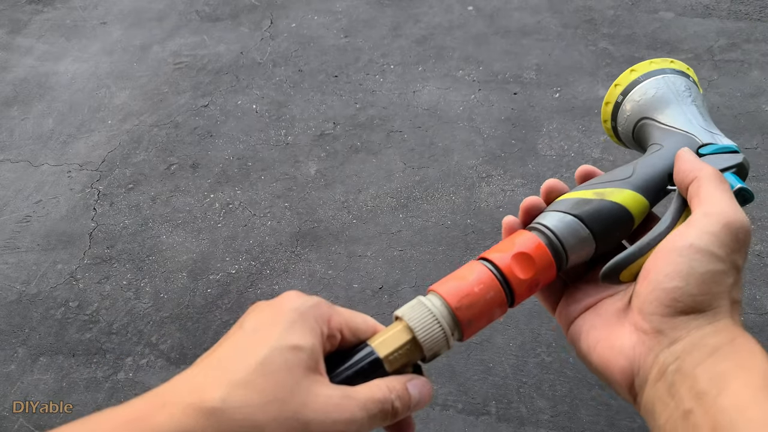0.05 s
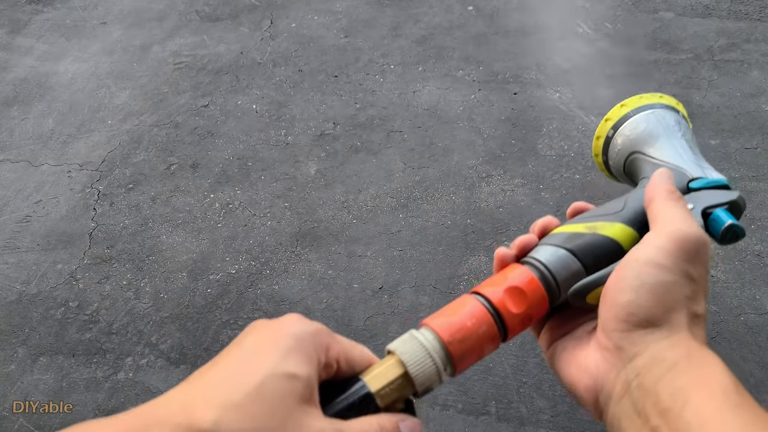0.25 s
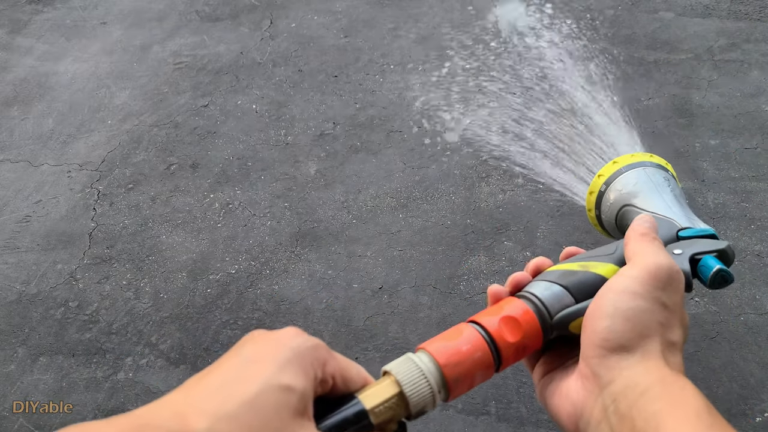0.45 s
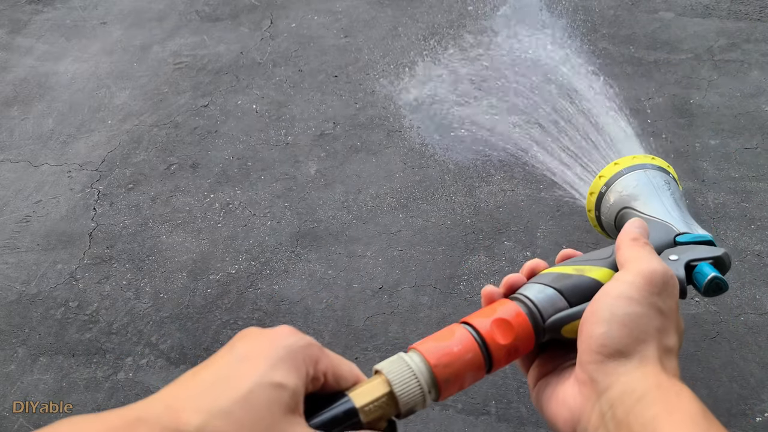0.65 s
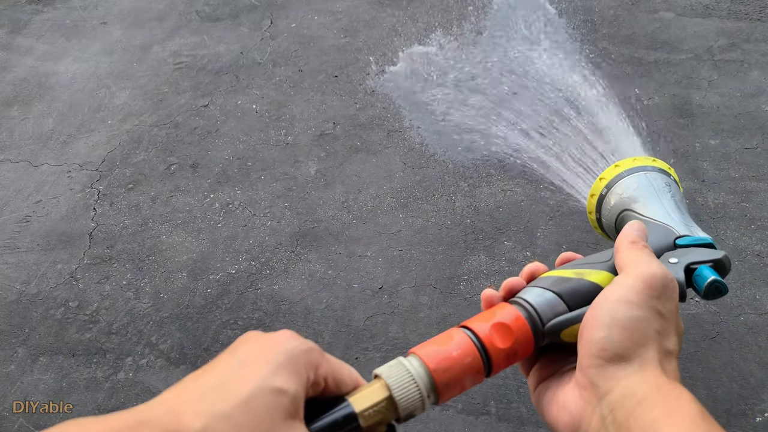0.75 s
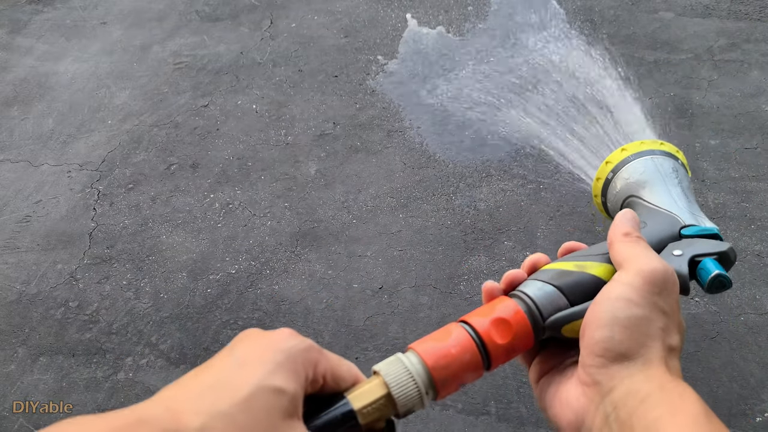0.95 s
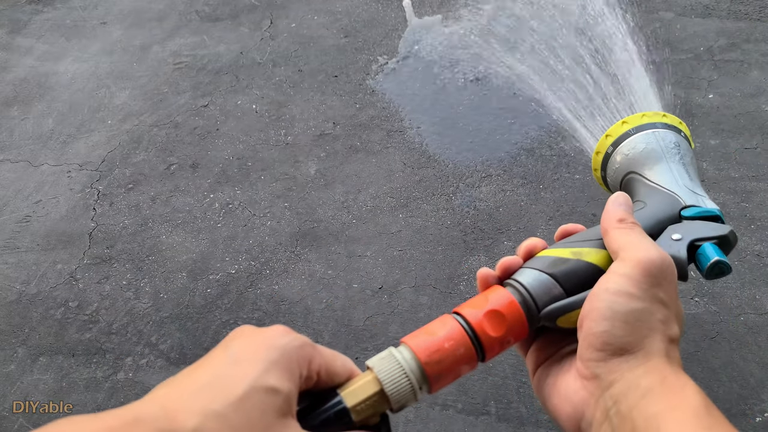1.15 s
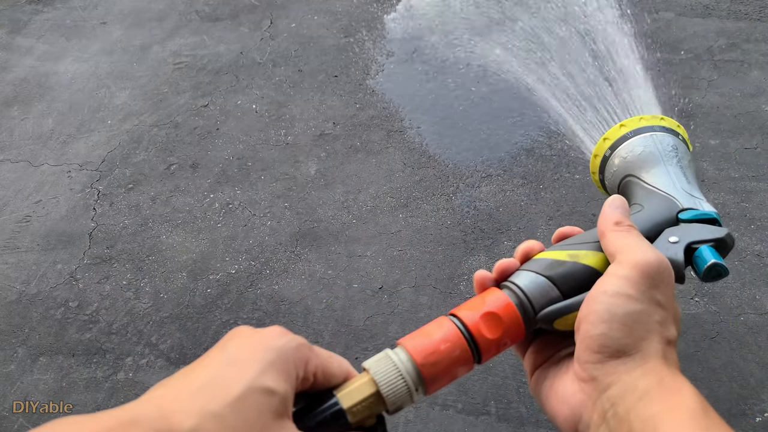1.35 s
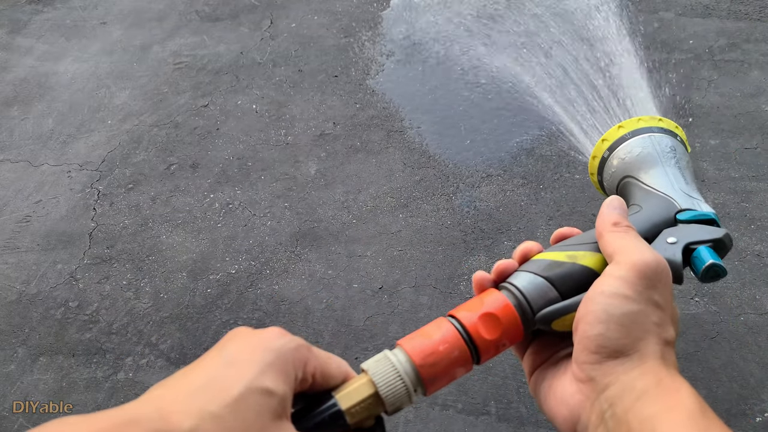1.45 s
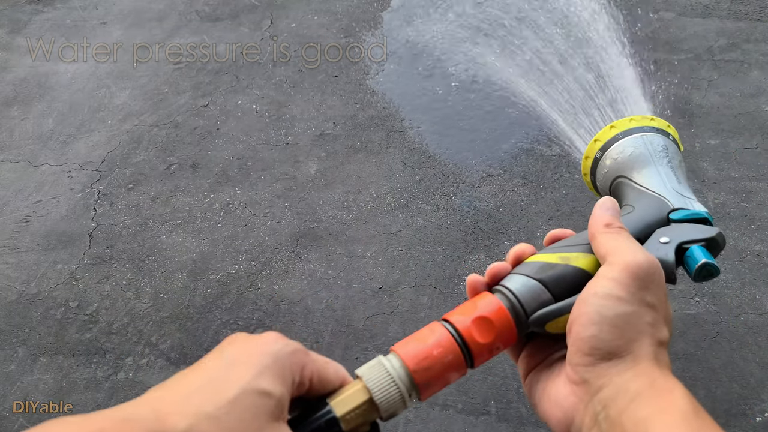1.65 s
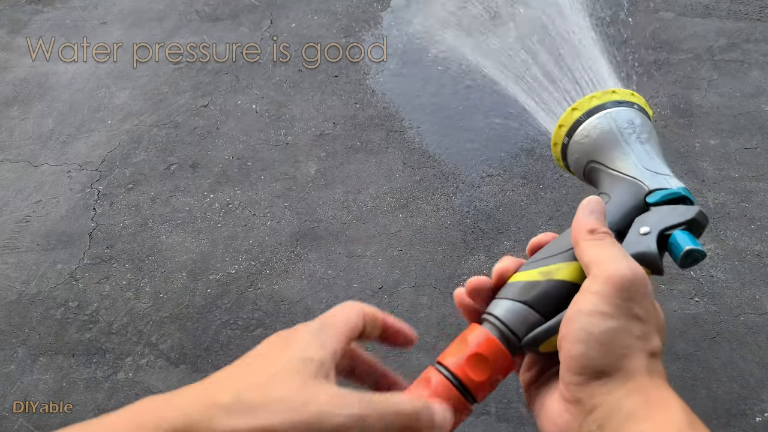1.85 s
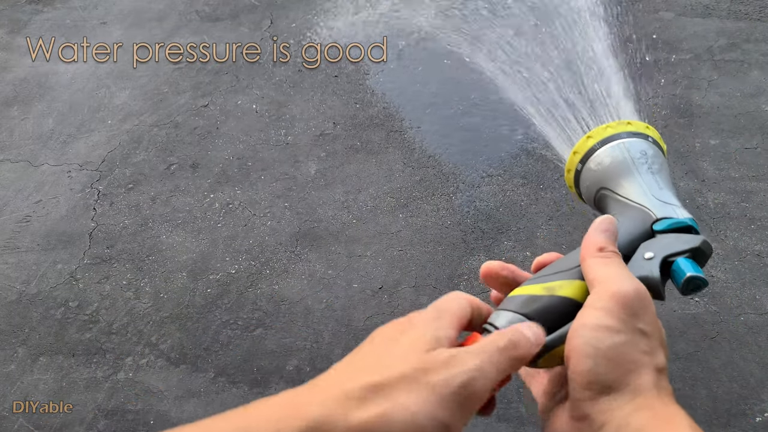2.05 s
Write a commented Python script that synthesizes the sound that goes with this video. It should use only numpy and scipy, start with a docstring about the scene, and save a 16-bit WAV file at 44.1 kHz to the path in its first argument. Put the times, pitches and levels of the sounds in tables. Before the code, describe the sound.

Water sprays from a hose nozzle with a sharp spitting air burst, then a steady hiss

```python
"""Outdoors over asphalt: a hose nozzle is squeezed open, heard from the right by two microphones
a few centimetres apart. Trapped air spits out in a burst, then the spray settles to a hiss.
Air and spray are clicks and noise with drifting colour; larger splats are made of short rings.
The valve's kick is damped sines, two hand knocks ring the fittings' modes, and a distant
low rumble is filtered noise."""
import sys
import numpy as np
from scipy import signal
from scipy.fft import rfft, irfft
from scipy.io import wavfile
from scipy.ndimage import uniform_filter1d

SR = 44100
rng = np.random.default_rng(int(sys.argv[2]) if len(sys.argv) > 2 else 0)


def bounce(signal):
    """Save signal as a 16-bit WAV file at the path given by the first command-line argument."""
    frames = np.transpose(np.atleast_2d(signal))
    limited = np.clip(frames, -1, 1)
    pcm = np.round(limited * 32767).astype(np.int16)
    wavfile.write(sys.argv[1], SR, pcm)


def invert_db(level):
    """Linear amplitude ratio for a level in decibels (20 dB per decade), elementwise."""
    return 10 ** (np.asarray(level, dtype=float) / 20)


N = 92610
TIME_S = np.arange(N) / SR
HZ = np.fft.rfftfreq(N, 1 / SR)

# power share common to both microphones: freq_hz, water_0_1, air_0_1, rumble_0_1
SHARED_POWER = [(30, 0.82, .97, 1), (69.5, 0.46, .97, 0.93), (150, 0.75, .97, 1), (300, 0.41, 0.91, 0.93),
                (550, 0.51, 0.78, 0.52), (880, 0.45, 0.56, 0.12), (2230, 0.87, 1, 0.13),
                (3700, 0.71, 0.27, 0.13), (7000, 0.16, 0.4, .2), (16000, 0.11, 0.81, .15)]
NOZZLE_LAG_S = 4 / 44100  # left hears the common part later


def read(points, hz, count=1):
    """Column of a table at the given frequencies, on a log axis."""
    table = np.array(points)
    return np.interp(np.log(hz + 1), np.log(table[:, 0] + 1), table[:, count])


def curve(points, count=1):
    """Column of a table along time."""
    table = np.array(points)
    return np.interp(TIME_S, table[:, 0], table[:, count])


def evened(x):
    """Scale to rms 1."""
    return x / np.sqrt(np.mean(x ** 2) + 1e-20)


def coloured(x, gain):
    """Filter by a gain for each frequency."""
    return irfft(rfft(x) * gain, N)


def left_right(left_db):
    """Gains of a source whose left side is set against the right."""
    return invert_db(np.array([[left_db], [0]]))


def pair(streams, share, lag_s):
    """One stream reaches both microphones, the other two one each; power shares add to 1."""
    share = np.clip(share, 0, 1)
    spectra = rfft(streams)
    left_delay = np.exp(-2j * np.pi * HZ * lag_s)
    common = spectra[0] * np.array([left_delay, np.ones(len(HZ))])
    return irfft(np.sqrt(share) * common + np.sqrt(1 - share) * spectra[1:], N)


def drops(per_s, spread_db, grain):
    """Three streams of random clicks of uneven size over smooth noise; grain weights the clicks."""
    hit = rng.random((3, N))
    size = rng.exponential(1, (3, N))
    noise = rng.standard_normal((3, N))
    clicks = (hit < per_s / SR) * np.sign(noise) * invert_db(spread_db * np.minimum(size, 4))
    grain = np.clip(grain, 0, 1)
    smooth = np.roll(noise, 999, axis=1)  # unties the noise from the click signs
    return np.sqrt(grain) * evened(clicks) + np.sqrt(1 - grain) * smooth


def patchy(x, patch_db, flicker_db, size=256):
    """Random level patches in time and frequency, and a flicker shared over wide bands."""
    overlap = size * 3 // 4
    z = signal.stft(x, nperseg=size, noverlap=overlap)[2]
    a, b = rng.standard_normal((2,) + z.shape[:0:-1])  # frames by bins, same for both sides
    patch = uniform_filter1d(uniform_filter1d(a, size=24, axis=0), size=3, axis=1)
    flicker = uniform_filter1d(uniform_filter1d(b, size=3, axis=0), size=30, axis=1)
    z = z * invert_db(patch_db * evened(patch) + flicker_db * evened(flicker)).T
    return signal.istft(z, nperseg=size, noverlap=overlap)[1][:, :N]


def blended(x, tone, share):
    """Cross-fade between the two colours of a table."""
    first = coloured(x, invert_db(read(tone, HZ, count=1)))
    second = coloured(x, invert_db(read(tone, HZ, count=2)))
    share = np.clip(share, 0, 1)
    return evened((1 - share) * first + share * second)


def rumble():
    """Far traffic or machinery: noise with a lumpy hump in the bass, a little louder at first."""
    # noise colour: freq_hz, relative_db_per_hz
    tone = [(15, -19), (40, -7.5), (55, -6), (66, -1), (78, 2), (95, -6), (125, -10.5), (200, -13.5),
            (400, -23.5), (700, -33.5), (950, -33), (1300, -38), (2500, -45.5), (5000, -60.5), (7000, -55),
            (9000, -61), (16000, -70)]
    level_db, early_db, fade_s = -41.5, 3.5, 0.72
    x = pair(rng.standard_normal((3, N)), read(SHARED_POWER, HZ, count=3), 0)
    extra_db = early_db * np.exp(-TIME_S / fade_s)
    return evened(coloured(x, invert_db(read(tone, HZ)))) * invert_db(level_db + extra_db)


def knocks():
    """A hand knocks the plastic fittings: same modes each time, a slower touch weakens the high ones."""
    # knocks: start_s, level_db, rise_s
    hits = [(2.0107, -21.5, 0.00015), (2.0592, -10.5, 0.0015)]
    # modes of the fittings: freq_hz, relative_db, t60_s
    modes = [(1226, -21, 0.025), (1570, -4, 0.014), (1720, -1.5, 0.022), (2300, -10, 0.014),
             (3210, -7, 0.02), (4100, 1, 0.0085), (4700, -9, 0.0099), (7100, -5, .007), (10200, 4, .005),
             (14500, 3, 0.006)]
    out = np.zeros((2, N))
    phases_rad = rng.normal(0, 0.57, (len(hits), len(modes), 2, 1))  # each side its own
    for (start_s, level_db, rise_s), hit_phases in zip(hits, phases_rad):
        t = np.maximum(TIME_S - start_s, 0)
        for (hz, mode_db, t60_s), phase in zip(modes, hit_phases):
            soft = (1 - np.exp(-t / rise_s)) / (1 + (hz * rise_s / 2) ** 2)
            decay = invert_db(level_db + mode_db - 60 * t / t60_s)
            out += decay * soft * np.sin(2 * np.pi * hz * t + phase)
    return out * left_right(-4)


def kick():
    """The hose kicks as the valve opens: low damped swings with a soft start."""
    # swings: start_s, level_db, freq_hz, t60_s
    swings = [(0.29, -28.5, 79, 0.15), (.236, -24, 185.6, 0.13), (.228, -28, 500, 0.16)]
    out = np.zeros(N)
    for start_s, level_db, hz, t60_s in swings:
        t = np.maximum(TIME_S - start_s, 0)
        soft = 1 - np.exp(-t * hz)
        out += invert_db(level_db - 60 * t / t60_s) * soft * np.sin(2 * np.pi * hz * t)
    return out * left_right(-3)


def splats():
    """Splats of water: short decaying rings, phase shaken differently at each microphone."""
    # one ring a row; the rows near 1.333 s together make one sharp splat:
    # start_s, level_db, centre_hz, ring_cycles (to fall 13 dB)
    rings = [(.378, -24, 2800, 3), (.7053, -19, 6300, 5), (.888, -25, 6500, 5), (1.1005, -22, 5000, 4),
             (1.333, -21, 12800, 6), (1.3337, -11, 12300, 7), (1.3341, -21, 5400, 5),
             (1.3392, -21, 11800, 26), (1.4478, -23, 6800, 7), (1.4527, -19, 13500, 6),
             (1.6275, -23, 13000, 5), (1.7205, -24, 5300, 4), (1.8628, -21, 4700, 4)]
    left_lag_s, wander_rad = .4 / 44100, .28  # rms wander after one radian of ring
    length = 600
    out = np.zeros((2, N + length))
    t = np.arange(length) / SR
    late = t - np.array([[left_lag_s], [0]])
    shakes = rng.standard_normal((len(rings), 2, length))
    for (start_s, level_db, hz, cycles), shake in zip(rings, shakes):
        wander = wander_rad * np.cumsum(shake, axis=1) * np.sqrt(2 * np.pi * hz / SR)
        shape = np.minimum(t * hz * 2, 1) * np.exp(-1.5 * t * hz / cycles)
        ring = invert_db(level_db) * shape * np.sin(2 * np.pi * hz * late + wander)
        out[:, round(start_s * SR):][:, :length] += ring
    return out[:, :N] * left_right(-4)


def spray():
    """Dense fine drops on asphalt; colour drifts between plain and ringing wet ground."""
    # course: time_s, level_db, ringing_share_0_1
    course = [(.21, -77, .1), (.26, -37, 0.9), (.4, -27.5, 0.15), (.62, -33.5, 0.28), (1.0, -33.5, 0.65),
              (1.4, -33, 1), (1.75, -33.5, 0.72), (2.0, -34, 0.3), (2.1, -33, 0.6)]
    # colour: freq_hz, plain_db_per_hz, ringing_db_per_hz (relative)
    tone = [(300, -3, -9.5), (710, -13.5, -13.5), (1510, 1, -5.5), (1610, -0.5, -15), (2007, -7, 8),
            (2120, -2.5, 4.5), (2350, 2, 7), (2680, -5, 0), (3060, 0, 1.5), (3506, 3, 1.5),
            (3440, 2.5, -4.5), (4320, -5.5, -3), (5560, -3.5, -5), (8700, 1.5, 0), (12800, -1, -0.5),
            (16000, -0.5, 0)]
    x = pair(drops(per_s=2500, spread_db=3., grain=0.14), read(SHARED_POWER, HZ), NOZZLE_LAG_S)
    x = patchy(x, patch_db=0.96, flicker_db=0.65)
    x = patchy(x, patch_db=1.6, flicker_db=0.64, size=1024)
    x = blended(x, tone, curve(course, count=2))
    return x * invert_db(curve(course)) * (np.arange(N) > course[0][0] * SR)


def air():
    """Sputtering air, then thinner froth, through the nozzle holes."""
    # course: time_s, level_db, froth_share_0_1
    course = [(.196, -70, 1), (.2, -47, 1), (.213, -39, 0.63), (.221, -24, 0), (.227, -17.5, 0),
              (.238, -12.5, 0), (.255, -15.5, 0.3), (.272, -20, 0.1), (.283, -26.5, 0), (.3, -22, 0.94),
              (.312, -28, 0.6), (.345, -32, 0.63), (.372, -36.5, 0.53), (.38, -28, 0.93), (.42, -31, 0.92),
              (.52, -40.5, 0.77), (.65, -62, .7)]
    # colour: freq_hz, air_db_per_hz, froth_db_per_hz (relative)
    tone = [(100, -8, -18), (186, -7, -19), (282, -14, -31), (526, 1.5, -18), (866, -6.5, -9.5),
            (1040, -2, -4), (1220, 4.5, -2.5), (1480, 8.5, -16), (1620, -3, -10), (1990, 7, -7),
            (2210, -3.5, 3), (2490, 5.5, -10.5), (2820, -3, 2), (3420, 2.5, -6), (3780, -2, -1),
            (5400, -4, -4.5), (5700, 0, 0.5), (7250, -4.5, -5), (9150, -3, -2.5), (11900, -9, -14),
            (16000, -7, -9)]
    grains = drops(per_s=3000, spread_db=-0.5, grain=0.15)
    x = pair(grains, read(SHARED_POWER, HZ, count=2), NOZZLE_LAG_S)
    x = patchy(x, patch_db=2.05, flicker_db=1.7)
    x = patchy(x, patch_db=2.04, flicker_db=0.8, size=1024)
    x = blended(x, tone, curve(course, count=2))
    return x * invert_db(curve(course)) * (TIME_S > course[0][0]) * (TIME_S < course[-1][0])


def scene():
    """All sources at the microphones."""
    return rumble() + knocks() + kick() + splats() + spray() + air()


def low_pass(x):
    """Removes everything above the highest recorded frequency."""
    return signal.sosfilt(signal.butter(12, 16900, fs=SR, output="sos"), x)


def record(dry):
    """Soft overload, then microphone colour and a steep treble limit."""
    # microphone colour: freq_hz, left_db, right_db
    mic = [(60, -0.8, -0.5), (130, 0.5, -0.5), (504, -1, 0.5), (930, 3, 3), (1520, 1.5, 1), (1970, -0.5, 3),
           (5140, 2, 5.5), (6240, 3.5, 8), (7160, 6, 4.5), (7510, 4.5, -6), (9270, -8.5, -5.5),
           (10480, -4, 1), (12300, 1.5, 6.5), (15300, 1, 7)]
    edge_hz, edge_width_hz = 15755, 40
    gain = invert_db(np.array([read(mic, HZ, count=k) for k in (1, 2)]))
    edge = np.clip((edge_hz - HZ) / edge_width_hz + .5, 0, 1) ** 2
    overloaded = 1.605 * np.tanh(dry / 1.596)
    mix = coloured(overloaded, gain * edge)
    return low_pass(mix)


dry = scene()
out = record(dry)
bounce(out)
```